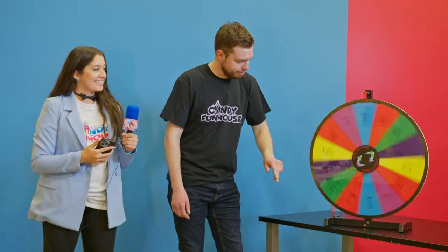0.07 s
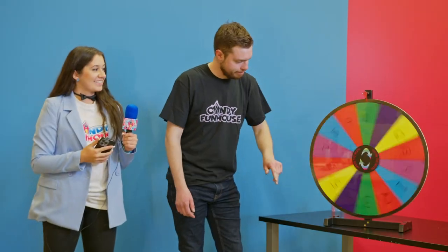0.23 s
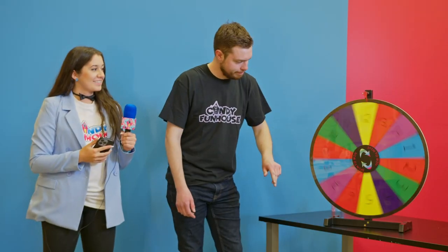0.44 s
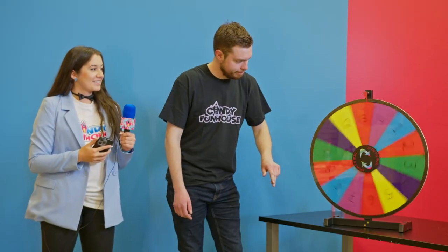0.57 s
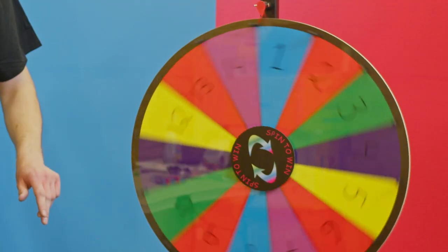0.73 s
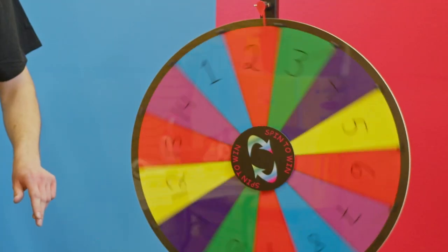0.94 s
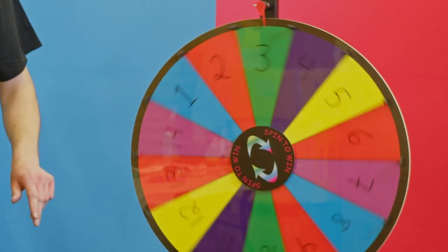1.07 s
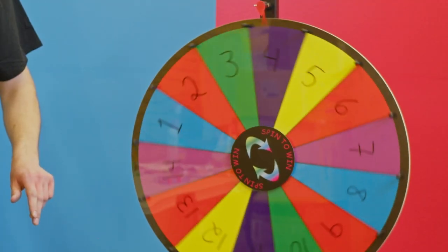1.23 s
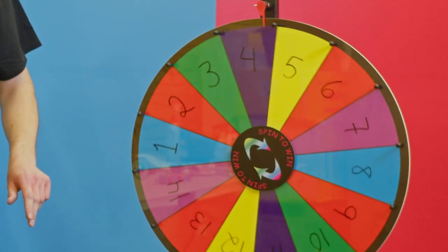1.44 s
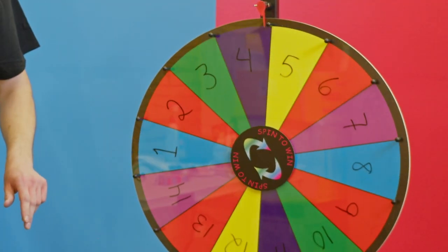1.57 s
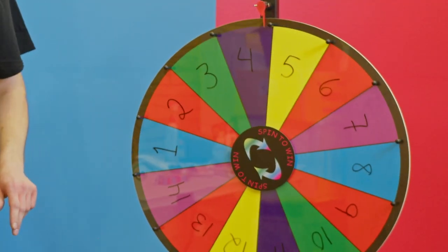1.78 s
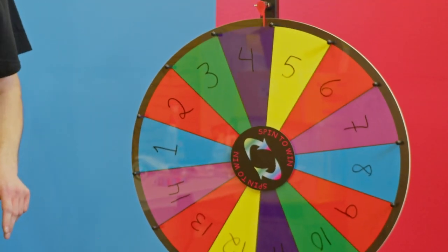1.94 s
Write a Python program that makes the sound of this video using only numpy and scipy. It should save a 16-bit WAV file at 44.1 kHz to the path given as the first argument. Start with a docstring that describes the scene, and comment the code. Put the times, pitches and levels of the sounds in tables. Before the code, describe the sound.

A prize wheel clicks from the start, its pegs flicking a plastic flapper about twelve times a second, each click bright with a tiny rattle. The clicks steadily spread out, with the last two at about 1.1 and 1.3 seconds. A faint low axle drone fades by about 1.7 seconds. Soft ventilation and electrical hum in the small room remain until the end, at about 2 seconds.

```python
"""Prize wheel coasting to a stop

A tabletop wheel slows down in a small room. Each peg brushes the plastic flapper, bends it and lets
go; the flapper then chatters in its mount, about 250 sharp ticks a second, and knocks the disc into
a faint ring. The axle drones while the wheel turns; mains hum and ventilation lie underneath."""
import sys
import numpy as np
from scipy import signal
from scipy.fft import rfft, irfft, next_fast_len
from scipy.io import wavfile
from scipy.ndimage import map_coordinates

SR = 44100
rng = np.random.default_rng(int(sys.argv[2]) if len(sys.argv) > 2 else 0)


def to_wav(s):
    """Save 16-bit WAV."""
    ch = np.atleast_2d(s).T  # columns
    pcm = np.round(np.clip(ch, -1, 1) * 32767)  # PCM
    wavfile.write(sys.argv[1], SR, pcm.astype(np.int16))


N = 88508

# bright plastic colour of the flapper: f/Hz, level/dB
FLAPPER_COLOUR = [(100, -29.5), (700, -30.5), (1400, -30.5), (2600, -23.5), (4700, -21.5), (5600, -23.5),
                  (6100, -13.5), (6450, -6), (6900, -4), (7200, 2.5), (7800, 0.5), (8200, -4), (8800, -4.5),
                  (10000, -7), (11000, -12.5), (13700, -13), (15300, -9), (16300, -20)]


def flapper_chatter(count=11):
    """The freed flapper snaps back and chatters, its ticks spreading and fading, while the disc rings."""
    # flapper slips off a peg: t/s, chatter level/dB, opening snap/dB, scrape before it/s, disc level/dB
    releases = [(-.0235, -1, 14.5, 0.0028, 1), (0.0566, 0, 5.5, .0015, 1), (0.1358, -0.5, 6.5, 0.0033, 1),
                (.2202, -1.5, 8.5, 0.0023, 0.5), (.3094, 0, 5, .005, 0.5), (0.4035, 1, 2, .0035, 0),
                (.504, 0, 5.5, .0015, -1), (0.6123, -1, 7, .0045, -1), (0.724, 0.5, 4.5, 0.002, 1),
                (0.8448, -1.5, 4.5, 0.0074, 0), (.965, 0.5, 2.5, 0.00074, 0), (1.113, -0.5, 5, .0033, 1),
                (1.312, -0.5, 9.5, 0.0032, -0.5)]
    first_gap_s, gap_growth, jitter_s = 0.0038, 1.028, 0.00008
    sharp_s, blunt_s = 0.00012, 0.00027  # contact times: the ticks dull as the snap fades
    rebound_s, rebound_db = 0.0009, -9.5  # each tick rebounds once off the mount
    mix_db, slip_db, knock_db, ring_db = -9.5, -15.5, -7.5, -10.5
    out, colour, k = np.zeros(N), impulse_response(FLAPPER_COLOUR), np.arange(count)
    snap = np.exp(-k / 2.26)
    contacts_s = blunt_s + (sharp_s - blunt_s) * snap
    loss_db = 0.65 * k + np.maximum(k - 7.67, 0)  # the last ticks die faster
    for start, chatter_db, snap_db, scrape_s, disc_db in releases:
        flick = np.zeros(SR // 2)
        gaps = first_gap_s * gap_growth ** (k - 1) + rng.normal(0, jitter_s, count)
        times = scrape_s + np.cumsum((k > 0) * gaps)
        gains = amp(chatter_db + snap_db * snap - loss_db)
        for at, gain, contact_s in zip(times, gains, contacts_s):
            add(flick, at, gain * tick(colour, contact_s))
            add(flick, at + rebound_s, gain * amp(rebound_db) * tick(colour, contact_s))
        for slip in range(3):  # the tip scrapes over the peg before it lets go
            add(flick, scrape_s * slip / 3, amp(slip_db) * tick(colour, contact_s=0.00046))
        scrape_start, knock_delay = start - scrape_s, 0.3 * scrape_s
        add(flick, knock_delay, amp(knock_db + disc_db) * disc_knock())
        add(out, scrape_start + knock_delay, amp(mix_db + ring_db + disc_db) * disc_ring())
        add(out, scrape_start, amp(mix_db) * in_room(flick))
    return out


def peg_brushes(count=4):
    """A peg meets the flapper, which brushes over it in a few tiny, fading skips."""
    # each peg's arrival: t/s, level/dB
    arrivals = [(0.0366, 0), (0.1148, -4), (0.2, -8), (0.289, -5), (0.381, -4.5), (0.479, -7),
                (0.587, -9.5), (.698, -8), (0.814, -9), (.939, -9.5), (1.081, -12), (1.26, -15)]
    mix_db, skip_gap_s, skip_step_db = -10, 0.0016, -3.05
    out, colour, k = np.zeros(N), impulse_response(FLAPPER_COLOUR), np.arange(count)
    for start, db in arrivals:
        brush = np.zeros(SR // 10)
        times = skip_gap_s * (k + rng.uniform(0, 0.7, count))
        for at, gain in zip(times, amp(skip_step_db * k)):
            add(brush, at, gain * tick(colour, contact_s=0.00019))
        add(out, start, amp(mix_db + db) * in_room(brush))
    return out


def tick(colour, contact_s, size=512):
    """One rough plastic contact: a tiny noise burst in the flapper's colour, energy 1."""
    evenness = 0.69  # 0 = every tick has a chance colour, 1 = all share the flapper's
    age = np.arange(size) / SR / contact_s
    spectrum = rfft(rng.standard_normal(size) * age ** 2 * np.exp(-age))
    burst = irfft(spectrum / (np.abs(spectrum) + 1e-9) ** evenness)[:size // 2]
    return unit_energy(np.convolve(burst, colour))


def disc_knock(t60_s=0.11):
    """The blow on the disc: many close modes that die quickly, played as a burst of noise."""
    # body of the knock: f/Hz, level/dB
    body = [(100, -5.5), (500, -12.5), (820, -5.5), (1150, -5.5), (1500, -7.5), (2280, -1), (2480, -15.5),
            (3200, -4.5), (4100, -3.5), (4650, 3.5), (5200, 0.5), (5600, -0.5), (9000, -20)]
    t = np.arange(SR // 4) / SR
    burst = rng.standard_normal(len(t)) * amp(-60 * t / t60_s)
    return unit_energy(np.convolve(burst, impulse_response(body)))


def disc_ring(attack_s=0.0045):
    """The modes of the disc, struck a little differently by every peg."""
    # modes of disc and stand: f/Hz, level/dB, t60/s
    modes = [(139, -2.5, .2), (199.3, -7.5, 0.12), (377, -9, .15), (571, -11, 0.32), (774.4, -4, 0.069),
             (827, -3, 0.2), (928, -6.5, 0.062), (1035, -7, 0.33), (1793, -8, 0.27), (2268, -3.5, 0.17),
             (3004, -6, 0.13), (3220, -7.5, 0.21), (3720, -2, 0.11)]
    t = np.arange(SR // 2) / SR
    ring = np.zeros(len(t))
    for hz, db, t60 in modes:
        decay = amp(db + rng.normal(0, 1) - 60 * t / t60)
        decay /= np.sqrt(t60 * SR / 14)  # a longer ring carries no extra energy
        ring += decay * np.sin(2 * np.pi * (hz * t + rng.random()))
    return ring * (1 - np.exp(-t / attack_s))


def axle():
    """A wavering low drone and rolling noise while the wheel turns."""
    # swells and fade of the drone: t/s, level/dB
    drone_fader = [(0, -57), (.13, -59), (.24, -55), (.37, -61), (.47, -56.5), (.64, -62.5), (.76, -56.5),
                   (.9, -51.5), (1.03, -55.5), (1.15, -68.5), (1.27, -64.5), (1.5, -66), (1.7, -83)]
    # colour of the rolling noise: f/Hz, level/dB
    roll_colour = [(40, 3), (100, -6), (150, -14), (300, -0.5), (600, -21), (900, -3), (1400, -15.5),
                   (2200, -5.5), (5000, -17), (15000, -27)]
    # fade of the rolling noise: t/s, level/dB
    roll_fader = [(0, -57), (.9, -58), (1.25, -63), (1.55, -74.5)]
    drone_hz, wander_hz, flutter_db = 115.8, 2.24, 1.8
    phase = 2 * np.pi * np.cumsum(drone_hz + wander_hz * wobble(18)) / SR
    drone = np.sqrt(2) * np.sin(phase) * amp(flutter_db * wobble(13.7))
    return fader(drone_fader) * drone + fader(roll_fader) * noise(roll_colour)


def in_room(x):
    """Direct sound, quick echoes from disc and table, and the small room's tail."""
    # decay of the tail: f/Hz, t60/s
    decay_times = [(200, 0.53), (1300, 1), (3500, 0.87), (7400, 0.7), (10000, 0.52), (15000, 0.26)]
    # colour of the tail: f/Hz, level/dB
    tail_colour = [(200, 10), (1500, 1), (4000, 6), (7400, -4.5), (15000, 4.5)]
    tail_db, build_s, early_db, early_t60_s = -4, 0.0027, -8.5, 0.023
    hz, frame_s, bands = signal.stft(rng.standard_normal(SR), SR, nperseg=256)
    bands_db = along(tail_colour, hz)[:, None] - 60 * frame_s / along(decay_times, hz)[:, None]
    tail = signal.istft(bands * amp(bands_db), SR, nperseg=256)[1]
    t = np.arange(len(tail)) / SR
    tail *= 1 - np.exp(-t / build_s)
    early = rng.standard_normal(len(t)) * amp(-60 * t / early_t60_s)
    response = amp(tail_db) * unit_energy(tail) + amp(early_db) * unit_energy(early)
    response[0] += 1  # direct sound
    return signal.fftconvolve(x, response)


def mains_hum():
    """Harmonics of the mains, each drifting slightly in phase."""
    # hum partials: f/Hz, level/dB
    partials = [(120, -80), (240, -66.5), (360, -67), (480, -78.5), (600, -76.5), (720, -75), (840, -75),
                (960, -83)]
    t = np.arange(N) / SR
    return sum(amp(db) * np.sqrt(2) * np.sin(2 * np.pi * (hz * t + rng.random()) + 0.15 * wobble(7.4))
               for hz, db in partials)


def ventilation():
    """A soft, rumbling bed of moving air."""
    # colour of the air: f/Hz, level/dB
    air_colour = [(15, 1.5), (30, 6), (55, -3.5), (90, -13.5), (200, -15.5), (400, -21), (900, -22.5),
                  (1300, -28), (2000, -27.5), (3000, -45), (5000, -42.5), (9000, -46), (15500, -48)]
    # its slight rise: t/s, level/dB
    air_fader = [(0, -57.5), (1.45, -54.5), (1.9, -55), (1.97, -53.5)]
    return fader(air_fader) * noise(air_colour)


def hiss():
    """A faint hiss that comes up near the end."""
    # colour of the hiss: f/Hz, level/dB
    hiss_colour = [(300, -13), (2000, -1), (8000, -4), (15500, -15.5)]
    # its late lift: t/s, level/dB
    hiss_fader = [(0, -87), (1.928, -93), (1.938, -70.5), (2.01, -76)]
    return fader(hiss_fader) * noise(hiss_colour)


def amp(db):
    """Decibels to gain."""
    return 10 ** (np.asarray(db) / 20)


def unit_energy(x):
    """Scale to energy 1."""
    return x / np.linalg.norm(x)


def along(points, hz):
    """Read (f/Hz, value) points on a log frequency axis."""
    freqs, values = np.transpose(points)
    return np.interp(np.log(hz + 1), np.log(freqs + 1), values)


def fader(points):
    """Gain per sample from (t/s, level/dB) points."""
    return amp(np.interp(np.arange(N) / SR, *np.transpose(points)))


def wobble(rate):
    """A smooth random curve, rate knots a second."""
    knots = rng.standard_normal(int(N * rate / SR) + 4)
    return map_coordinates(knots, [np.arange(N) * rate / SR])


def filtered(x, response):
    """Equalise x with a gain that depends on frequency."""
    size = next_fast_len(N + SR // 2)
    return irfft(rfft(x, size) * response(np.fft.rfftfreq(size, 1 / SR)), size)[:N]


def noise(colour):
    """Coloured noise of rms 1."""
    x = filtered(rng.standard_normal(N + SR // 4), lambda hz: amp(along(colour, hz)))
    return x / np.sqrt(np.mean(x ** 2))


def impulse_response(colour, size=1024):
    """Minimum-phase click of energy 1 with this colour."""
    cepstrum = irfft(np.log(amp(along(colour, np.fft.rfftfreq(size, 1 / SR)))))
    cepstrum[1:size // 2] *= 2
    cepstrum[size // 2 + 1:] = 0
    return unit_energy(irfft(np.exp(rfft(cepstrum))))


def add(track, at_s, x):
    """Mix x into track at a time, trimming what overhangs."""
    i = round(at_s * SR)
    x = x[max(-i, 0):][:len(track) - max(i, 0)]
    track[max(i, 0):][:len(x)] += x


def scene():
    """The wheel in its room, in mono."""
    return (flapper_chatter() + peg_brushes() + axle() + mains_hum() + ventilation() + hiss())[None]


def record(dry):
    """A steep high cut on the whole mix."""
    cutoff_hz = 16200
    return filtered(dry[0], lambda hz: 1 / (1 + (hz / cutoff_hz) ** 160))[None]


dry = scene()
out = record(dry)
to_wav(out)
```